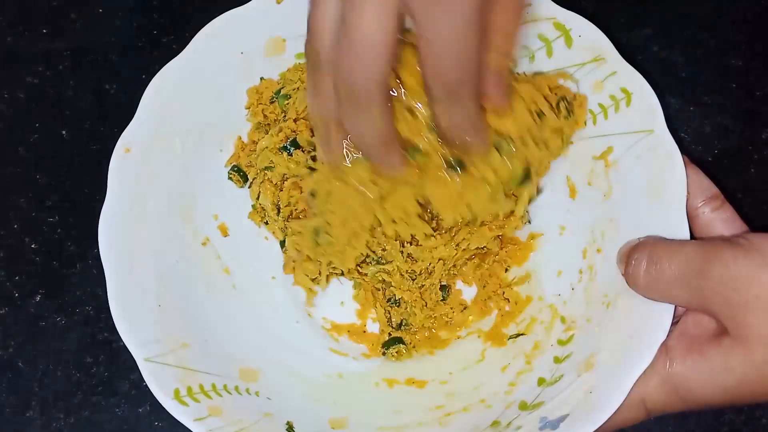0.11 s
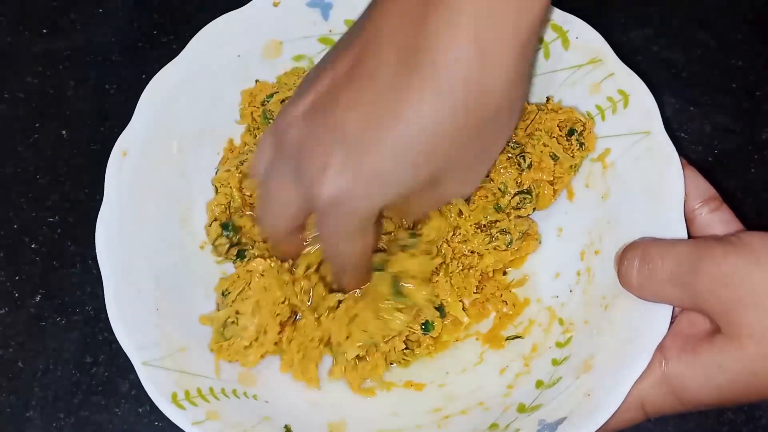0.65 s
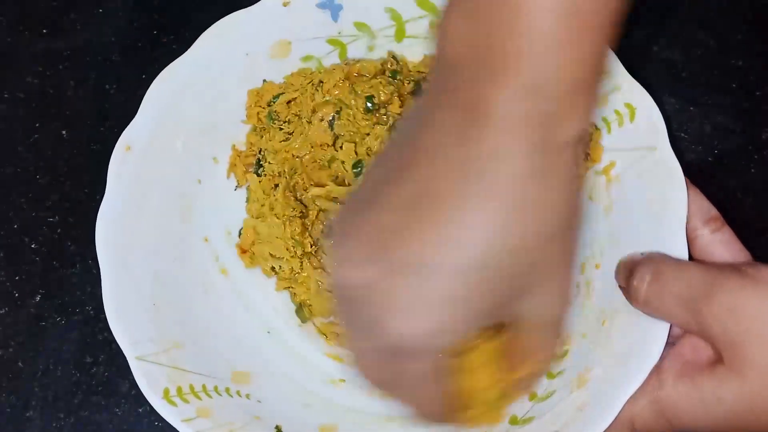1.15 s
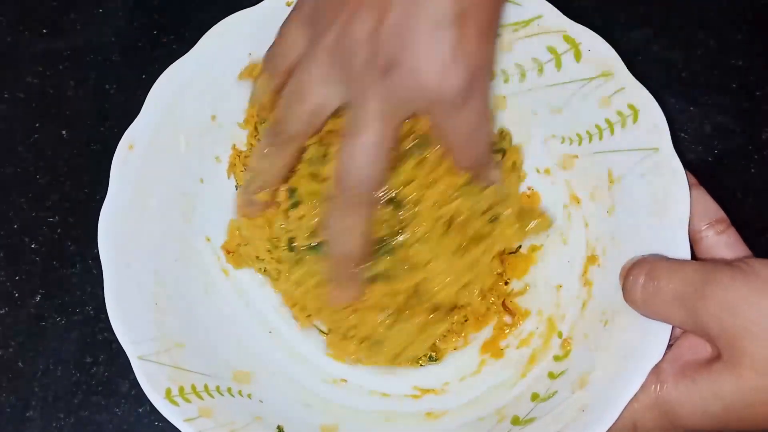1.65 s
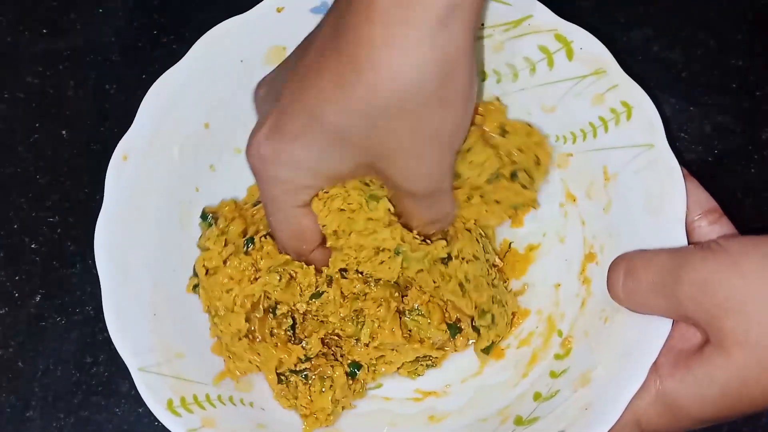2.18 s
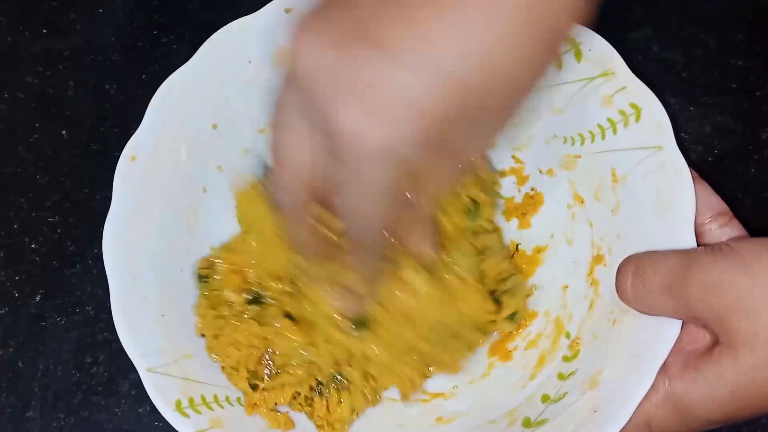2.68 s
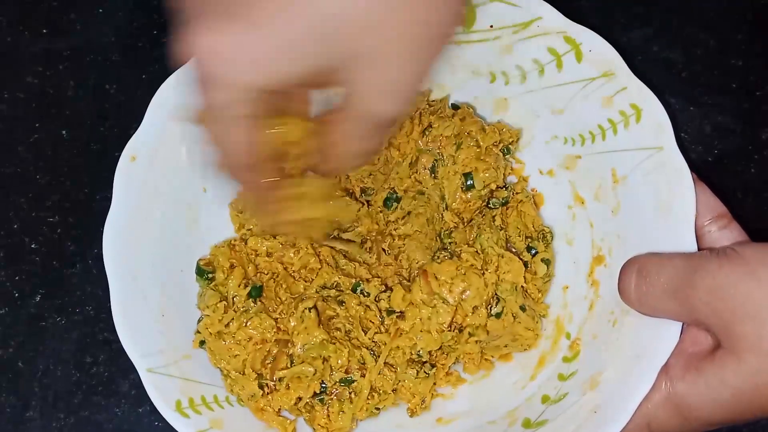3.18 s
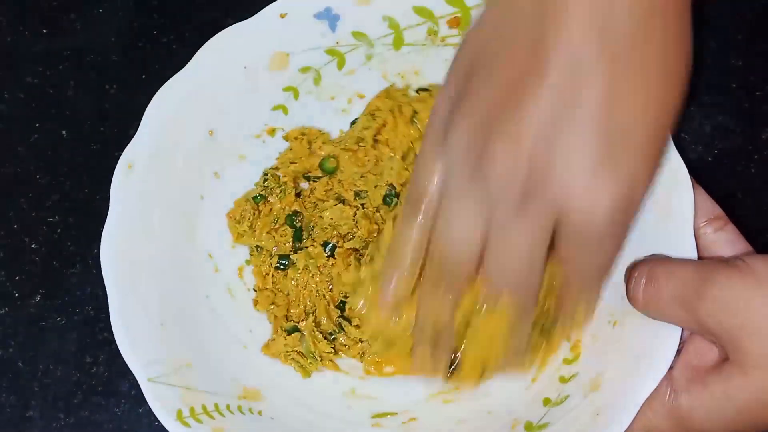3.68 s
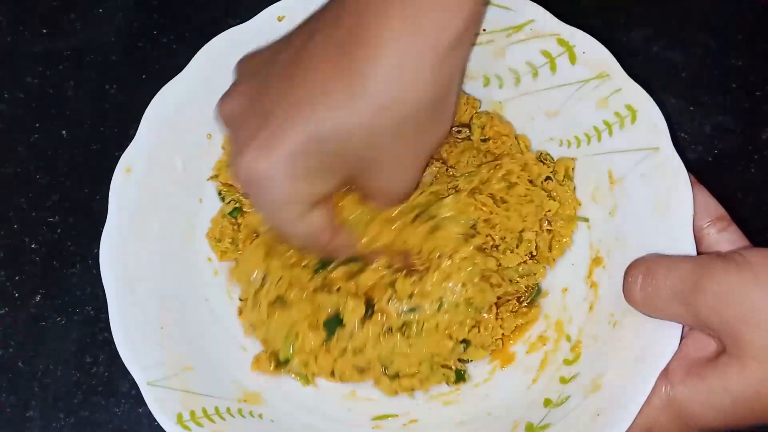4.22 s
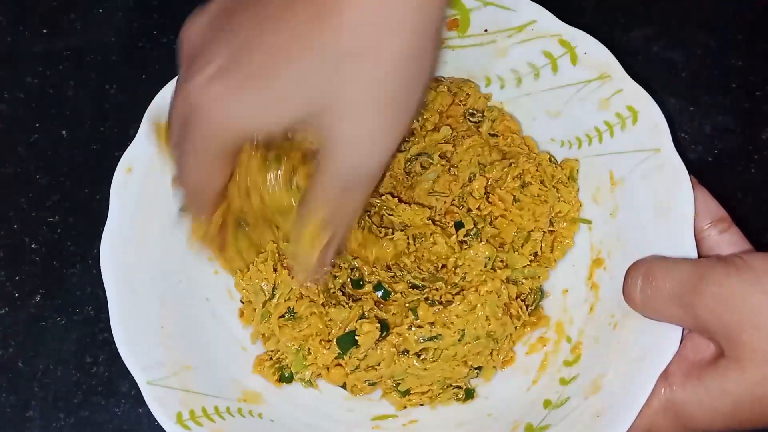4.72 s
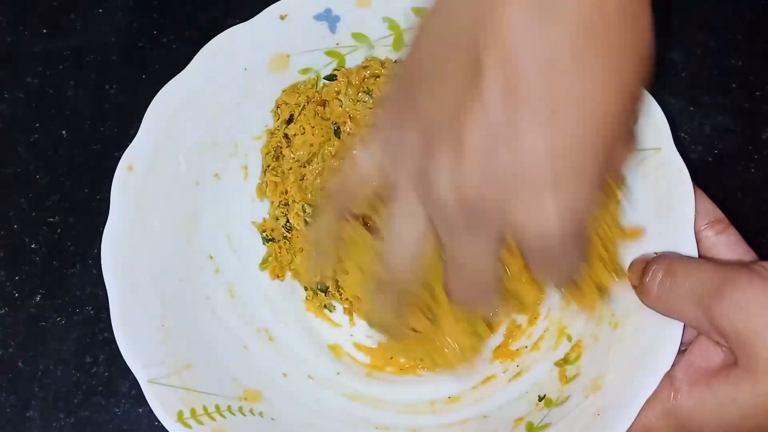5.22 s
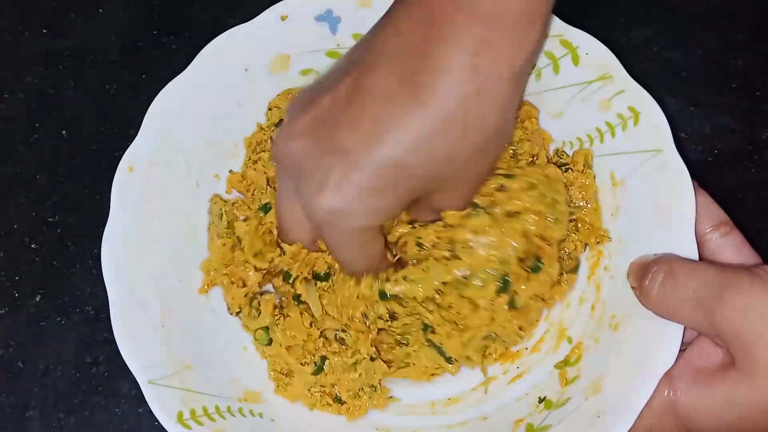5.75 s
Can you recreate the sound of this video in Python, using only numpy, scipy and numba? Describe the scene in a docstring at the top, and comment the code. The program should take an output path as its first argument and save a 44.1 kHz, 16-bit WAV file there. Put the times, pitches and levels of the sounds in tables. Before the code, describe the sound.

Very close in a small hard-walled kitchen, a hand kneads a wet, sticky vegetable mix. It opens with a hollow bowl knock, then gentle crackling and isolated smacks; a strong knock and pop lands near 0.8 s. The loudest wet squelch bursts around 2.1 s, quieter stirring follows, and from 4 s the squeezes grow denser. Soft low bumps and faint hum sit beneath.

```python
"""Kneading a wet dough by hand

A hand kneads a sticky vegetable and flour mix in a bowl on a kitchen counter, a phone close by.
Bursting air pockets are short sine grains: dense crackle, lone smacks of tearing film and deep pops.
The bowl rocks, rubs and is knocked: noise through its resonances; narrow notes swell and fade.
Pockets also sound in a decaying noise tail, the hard-walled kitchen; a faint coloured hum lies below."""
import sys
import numpy as np
from scipy import signal
from scipy.fft import rfft, irfft
from scipy.io import wavfile
from scipy.ndimage import uniform_filter1d
from numba import njit

SR = 44100
rng = np.random.default_rng(int(sys.argv[2]) if len(sys.argv) > 2 else 0)


def store_pcm(level_fs):
    """Save levels as 16-bit WAV."""
    pcm = np.round(np.clip(level_fs, -1, 1) * 32767).astype(np.int16)
    wavfile.write(sys.argv[1], SR, np.atleast_2d(pcm).T)


def amplitude_ratio(level_db):
    """Convert a level in decibels to the matching linear amplitude (field) ratio."""
    exponent = np.asarray(level_db, float) / 20
    return 10 ** exponent


N = 258867
TIME = np.arange(N) / SR


def level(x, db):
    """Scale to an rms level."""
    return x * amplitude_ratio(db) / np.sqrt(np.mean(x ** 2))


def colour(x, points):
    """Weight the spectrum by (frequency [Hz], level [dB]) points, joined over log frequency."""
    hz, db = np.transpose(points)
    bins = np.maximum(np.fft.rfftfreq(N, 1 / SR), 1)
    weight = amplitude_ratio(np.interp(np.log(bins), np.log(hz), db))
    return irfft(rfft(x) * weight, N)


def ring(x, modes):
    """Sum of resonances (frequency [Hz], width [Hz], level [dB]) driven by x."""
    out = 0
    for hz, width, db in modes:
        out = out + amplitude_ratio(db) * signal.lfilter(*signal.iirpeak(hz, hz / width, fs=SR), x)
    return out


def band_pass(x, low_hz, high_hz):
    """Keep what lies between two frequencies."""
    return signal.sosfilt(signal.butter(2, [low_hz, high_hz], "band", fs=SR, output="sos"), x)


def walk(rate):
    """Random levels held 1 / rate s and slewed; spread near 1."""
    held = int(SR / rate)
    steps = np.repeat(rng.standard_normal(N // held + 1), held)
    return uniform_filter1d(steps, held)[:N]


def gestures(s, held, db, rise, fall, rest_db):
    """Gain over time: each gesture rises, holds and falls at fixed dB/s; powers add to a resting level."""
    power = amplitude_ratio(2 * rest_db) + 0 * TIME
    for start, hold, top_db in zip(s, held, db):
        near = slice(max(int((start - .3) * SR), 0), int((start + hold + .5) * SR))
        t = TIME[near] - start
        drop_db = rise * np.maximum(-t, 0) + fall * np.maximum(t - hold, 0)
        power[near] += amplitude_ratio(2 * (top_db - drop_db))
    return np.sqrt(power)


@njit
def bubbles(start_s, hz, cycles, size, glide):
    """Each burst pocket swells for the given cycles, then dies away while its pitch rises."""
    out = np.zeros(N)
    for g in range(len(hz)):
        tau, first = cycles[g] / hz[g] * SR, start_s[g] * SR
        for i in range(int(first) + 1, min(int(first + 8 * tau), N)):
            u = (i - first) / tau
            swell = u * np.exp(1 - u)
            out[i] += size[g] * swell * np.sin(2 * np.pi * cycles[g] * u * (1 + glide * u))
    return out


# gentle stirring between squeezes: (time [s], level of middle pockets [dB])
STIRRING = [(0, -78), (.2, -82), (.32, -73), (.68, -74), (.95, -86.5), (1.2, -75.5), (1.6, -73), (1.7, -77),
            (1.8, -66), (2.24, -67.5), (2.8, -78), (3.07, -70.5), (3.27, -88), (3.5, -78), (4.0, -69),
            (4.15, -59), (4.4, -73), (4.68, -85), (4.84, -78), (5.12, -68), (5.52, -69), (5.87, -70)]
# squeezes of the hand: (time [s], held [s], level of middle pockets [dB],
#   large pockets [dB re middle], tiny pockets [dB re middle])
HAND_SQUEEZES = [(.01, 0.013, -61.5, 0, -1), (.327, 0.021, -64, -6, -3), (0.418, 0.16, -65.5, -29, 1),
                 (.585, 0.0064, -51.5, -11, -5.5), (0.713, 0.0075, -64.5, -2, -2),
                 (0.777, 0.011, -47, -17, -7.5), (.992, 0.046, -73.5, -2, -16),
                 (1.062, .13, -66, -6.5, -1.5), (1.626, 0.0063, -54.5, -25, -4.5),
                 (1.79, .2, -69.5, -32, -15), (1.999, 0.025, -54.5, -22, -4.5), (2.04, .02, -49, -15, -19),
                 (2.069, 0.015, -45, -2.5, -3.5), (2.132, 0.0039, -45.5, 6, -8),
                 (2.157, 0.0066, -50.5, 1.5, -26), (2.836, .18, -61, -7.5, 0), (3.11, 0.03, -54.5, -2.5, 1),
                 (3.46, 0.0075, -71.5, -28, 8.5), (3.545, .09, -65, -11, -5), (3.755, 0.011, -69.5, -7, 8),
                 (3.84, 0.051, -62, -18, -2), (3.933, 0.0046, -60.5, -32, -4),
                 (4.167, 0.028, -50, -10.5, -12), (4.24, 0.085, -56.5, -8.5, -3.5),
                 (4.446, 0.079, -60.5, -17, -3), (4.531, 0.016, -54.5, -8, -2.5),
                 (4.859, .06, -57.5, -11, -6.5), (4.94, 0.098, -61, -5.5, -4),
                 (5.15, 0.094, -60.5, -10, -3.5), (5.373, 0.0052, -53.5, -29, -3),
                 (5.6, 0.064, -66, 7, -0.5), (5.689, 0.074, -60, 2.5, -1), (5.769, 0.027, -56.5, -1.5, -1)]


def effort():
    """Gains of large, middle and tiny pockets: brief squeezes add power to the stirring."""
    rise_db_s, fall_db_s = 1194.5, 330.5
    stir_large_db, stir_tiny_db = -13, 2  # re middle pockets
    s, held, db, large_db, tiny_db = np.transpose(HAND_SQUEEZES)
    stir_db = np.interp(TIME, *np.transpose(STIRRING))
    large = gestures(s, held, db + large_db, rise_db_s, fall_db_s, stir_db + stir_large_db)
    middle = gestures(s, held, db, rise_db_s, fall_db_s, stir_db)
    tiny = gestures(s, held, db + tiny_db, rise_db_s, fall_db_s, stir_db + stir_tiny_db)
    return large, middle, tiny


# air pockets, large, middle, tiny:
#   (lowest [Hz], highest [Hz], rate [bursts/s], cycles in two rise times, size scatter [dB])
POCKET_SIZES = [(1308, 4280, 1200, 1.48, 4), (3160, 9300, 3200, 1.07, 3.0), (8500, 15400, 3500, 4.4, 4)]
# trapped pockets that keep ringing, one row of the same columns
RINGING_POCKETS = (1700, 7000, 220, 44.0, 2.5)
# colour of the close phone on the crackle: (frequency [Hz], level [dB])
PHONE_COLOUR = [(800, -23.5), (1500, 0.5), (3000, 1), (4900, 8), (5900, 11.5), (7200, 6.5), (8100, -6),
                (9200, 1.5), (10800, -3), (13000, -13), (14200, -8), (15300, 5.5), (16500, -18)]


def crackle(large, middle, tiny):
    """Pockets of each size burst at random, in flurries; those close in time have like pitch."""
    ringing = middle * amplitude_ratio(-5.0)
    flurry = amplitude_ratio(0.81 * walk(41))
    out = 0
    kinds = zip(POCKET_SIZES + [RINGING_POCKETS], (large, middle, tiny, ringing))
    for (low_hz, high_hz, rate, cycles, scatter_db), gain in kinds:
        when, own, rarity = rng.random((3, int(rate * N / SR)))
        drift = np.tanh(walk(25))[(when * (N - 1)).astype(int)]
        # share of pitch in common with neighbours; the tiniest pockets have none
        alike = 0.39 * (high_hz < 10000)
        place = np.clip(own * (1 - alike) + alike * (1 + drift) / 2, 0, 1)
        hz = low_hz * (high_hz / low_hz) ** place
        size = amplitude_ratio(-scatter_db * np.log(rarity + 4e-3))
        grains = bubbles(when * N / SR, hz, cycles / 2 + 0 * hz, size, 0.024 / cycles)
        out = out + level(colour(grains, PHONE_COLOUR), 0) * gain
    return out * flurry


# decay of the kitchen: (frequency [Hz], time to fall by 60 dB [s])
KITCHEN_DECAY = [(250, 0.2), (1000, 0.45), (2000, 0.47), (4000, 0.15), (12000, 0.18)]


def kitchen(x):
    """Diffuse tail of unit energy, shorter in the treble, stronger at first from bowl and counter close by."""
    hz, t60 = np.transpose(KITCHEN_DECAY)
    t, tail = TIME[:SR], 0
    for centre in 125 * 2. ** np.arange(7):
        band = band_pass(rng.standard_normal(SR), centre / 2 ** .5, centre * 2 ** .5)
        band_t60 = np.interp(np.log(centre), np.log(hz), t60)
        tail = tail + band * np.exp(-np.log(1000) * t / band_t60)
    fade_in = np.clip(t / .005, 0, 1)
    tail = tail * fade_in * (1 + .3 * np.exp(-t / .008))
    return signal.fftconvolve(x, tail / np.sqrt(np.sum(tail ** 2)))[:N]


# colour of the room hum: (frequency [Hz], relative level per Hz [dB])
HUM_COLOUR = [(15, -38), (25, -34.5), (124, 12), (312, -1.5), (1430, -16.5), (1640, -1), (2460, -39.5),
              (6020, -29), (8120, -21), (9820, -9), (13600, -31.5), (15200, -12.5), (16400, -32.5)]


def room_hum():
    """Coloured noise at a faint level that wanders slowly."""
    return level(colour(rng.standard_normal(N), HUM_COLOUR), -79) * amplitude_ratio(2.0 * walk(1.0))


# low modes of bowl and counter: (frequency [Hz], width [Hz], level [dB])
ROCKING_MODES = [(106.8, 23.7, 16.5), (125.6, 6.2, 15.5), (175, 17, -15.5), (71, 36, -6.5)]
# the bowl rocks on the counter: (time [s], held [s], level before the low-pass [dB])
BOWL_ROCKS = [(.13, 0.019, -68), (.4, 0.025, -72), (.85, 0.1, -56.5), (1.0, 0.013, -60),
              (1.09, 0.014, -61.5), (1.27, 0.019, -68.5), (1.4, 0.012, -63.5), (1.67, .015, -73),
              (1.96, 0.3, -77.5), (2.5, 0.019, -66), (2.97, .015, -67.5), (3.12, 0.094, -62),
              (3.62, .08, -66.5), (3.76, 0.14, -64.5), (4.02, 0.022, -62), (4.21, 0.035, -61),
              (4.48, 0.0087, -67.5), (4.8, 0.033, -57.5), (5.0, 0.071, -70), (5.18, 0.061, -62),
              (5.37, .015, -63), (5.48, 0.14, -73)]


def rocking():
    """Noise of unsteady contact drives the low modes as the bowl rocks."""
    gain = gestures(*np.transpose(BOWL_ROCKS), rise=193.5, fall=130, rest_db=-77)
    thud = level(ring(rng.standard_normal(N), ROCKING_MODES), 0) * gain
    return signal.sosfilt(signal.butter(2, 330, fs=SR, output="sos"), thud)


# modes that rubbing drives: (frequency [Hz], width [Hz], level [dB])
RUBBING_MODES = [(239, 77, 2.5), (404, 41, 3), (480, 40, 3), (545, 31, -1.5), (610, 35, -7), (771, 68, -8),
                 (885, 450, -13.5), (1100, 990, -7)]
# the bowl rubs over the counter: (time [s], held [s], level before the band-pass [dB])
BOWL_RUBS = [(0.939, 0.067, -57), (1.85, 0.06, -70.5), (2.46, 0.13, -65.5), (3.96, 0.03, -68),
             (4.2, 0.017, -69), (4.43, .015, -67), (4.54, .015, -66.5), (4.8, 0.066, -62),
             (5.13, 0.013, -58.5), (5.3, 0.013, -65.5), (5.65, 0.033, -66.5)]


def rubbing():
    """Noise of an uneven grip drives the modes as the bowl rubs over the counter."""
    grip = amplitude_ratio(2.5 * walk(30))
    gain = gestures(*np.transpose(BOWL_RUBS), rise=220.5, fall=165, rest_db=-73)
    rub = level(ring(rng.standard_normal(N) * grip, RUBBING_MODES), 0) * gain
    return band_pass(rub, 210, 1500)


def swelling_notes(rows):
    """Noise in a steep resonance (the same one twice), under a swell and a random flutter."""
    out = np.zeros(N)
    for start, length, peak, hz, width, db in rows:
        first, size = int(start * SR), int(length * SR)
        mode = [(hz, width, 0)]
        noise = ring(ring(rng.standard_normal(SR), mode), mode)[-size:]
        swell = np.interp(np.arange(size) / size, [0, np.clip(peak, .02, .98), 1], [0, 1, 0])
        flutter = amplitude_ratio(2.7 * walk(60)[:size])
        out[first:first + size] += (level(noise, db) * swell * flutter)[:N - first]
    return out


# knocks that ring the bowl:
#   (time [s], ring [s], level before swell and flutter [dB], middle of the blow's spectrum [Hz])
BOWL_KNOCKS = [(0, .15, -46, 870), (.825, .19, -46, 480), (5.268, .14, -51, 865)]
# modes that a knock rings: (frequency [Hz], width [Hz], level [dB])
KNOCKED_MODES = [(242, 40, 3), (431, 61, -8.5), (480, 50, -3), (606, 30, -11.5), (802, 84, -3),
                 (1091, 66, 2)]


def knocks():
    """A blow rings each bowl mode, the more weakly the further it lies from the blow's own spectrum."""
    blow_octaves = 0.85  # a mode this far off is 6 dB weaker
    rows = []
    for s, length, db, blow_hz in BOWL_KNOCKS:
        for hz, width, mode_db in KNOCKED_MODES:
            off_db = 6 * (np.log2(hz / blow_hz) / blow_octaves) ** 2
            rows.append((s, length, .07, hz, width, db + mode_db - off_db))
    return swelling_notes(rows)


# deep pockets: (time [s], level [dB], pitch [Hz], room share [dB])
DEEP_POPS = [(.005, -28, 1008, -10.5), (0.602, -43, 2100, -4), (.82, -15.5, 1075, -1.5),
             (1.353, -55, 840, -4.5), (1.426, -49, 1120, -6), (1.927, -50.5, 1590, -4),
             (2.072, -41.5, 2180, -4), (2.085, -41.5, 1600, -12), (2.131, -40.5, 1500, -7),
             (2.154, -36, 2410, -4.5), (2.164, -43, 1960, -8), (2.481, -58.5, 1060, 5),
             (2.983, -52, 1440, -16.5), (3.112, -59, 2230, 8), (3.221, -60.5, 1230, 2.5),
             (3.41, -38.5, 1160, -8.5), (3.96, -49.5, 1650, -1), (4.244, -43, 2570, -12),
             (4.538, -46.5, 1210, -7.5), (4.998, -44.5, 310, -3), (5.115, -49.5, 1600, -5),
             (5.191, -38, 1125, -0.5), (5.255, -46, 1200, -11), (5.274, -36.5, 1100, -14),
             (5.296, -47, 1150, -38), (5.749, -49, 2130, 6)]


def pops():
    """Returns direct pops, each with a higher overtone, and the blunter blow that reaches the kitchen."""
    s, db, hz, room_db = np.transpose(DEEP_POPS)
    s, hz = np.tile(s, 2), np.r_[hz, 1.5 * hz]
    db = np.r_[db, db - 7.5]
    cycles = 1 + 0 * hz
    direct = bubbles(s, hz, cycles, amplitude_ratio(db), 0.017)
    sent = bubbles(s, hz, 0.61 * cycles, amplitude_ratio(db + np.tile(room_db, 2)), 0.068)
    return direct, sent


def small_smacks(middle, count=130):
    """Rows like the loud smacks, at random moments, stronger where the kneading is."""
    when, pitch, spread, size = rng.random((count, 4)).T
    kneading_db = 20 * np.log10(middle[(when * (N - 1)).astype(int)])
    # around -51 dB when the middle pockets are at -65 dB, scattered by up to 8 dB
    db = 0.71 * (kneading_db + 65) - 51 + 8 * (2 * size - 1)
    return np.c_[when * N / SR, db, 4000 * 2 ** (1.1 * pitch), .2 + .4 * spread]


# loud smacks of sticky film letting go:
#   (time [s], level of the first pocket [dB], pitch [Hz], spread [octaves])
LOUD_SMACKS = [(.038, -39, 9360, 0.16), (.325, -48.5, 4000, 0.76), (.339, -41.5, 6550, 0.11),
               (.4965, -38.5, 8300, 0.23), (.58, -34, 5700, .32), (.5892, -35.5, 5550, 0.66),
               (.764, -39, 6770, 0.56), (.777, -35, 5860, 0.3), (.7838, -25.5, 5700, 0.45),
               (.82, -38.5, 2870, 0.18), (1.081, -41.5, 9700, 0.23), (1.1878, -41, 6060, 0.21),
               (1.453, -50.5, 6080, .19), (1.486, -44.5, 9600, .19), (1.5172, -50, 5130, 0.27),
               (1.6308, -25.5, 4670, 0.29), (2.0363, -38, 4700, 0.24), (2.0665, -30, 5630, 0.32),
               (2.0703, -31, 6700, 0.24), (2.0835, -24, 6750, 0.29), (2.1332, -25.5, 4980, 0.25),
               (2.157, -26.5, 5100, 0.23), (2.1652, -30.5, 5660, 0.14), (2.241, -44, 8300, 0.2),
               (2.748, -45.5, 9400, 0.3), (2.84, -43.5, 6070, 0.15), (2.9966, -37.5, 5200, 0.7),
               (3.1048, -43, 8750, .16), (3.115, -37, 8200, 0.17), (3.1451, -47, 3950, .37),
               (3.461, -43, 9900, 0.66), (3.5337, -41.5, 8300, 0.81), (3.633, -41.5, 4570, 0.3),
               (3.671, -43, 6500, 0.49), (3.7467, -44, 8840, .33), (3.8448, -34, 7900, 0.7),
               (3.8602, -30, 9000, 0.82), (3.8959, -45, 9800, 0.24), (3.9268, -40.5, 9900, 0.15),
               (3.9348, -39.5, 5050, 0.36), (4.1678, -34.5, 5430, 0.48), (4.197, -45, 5300, .35),
               (4.2475, -42, 4100, 0.77), (4.258, -40.5, 7100, 0.36), (4.3168, -43, 5060, 0.33),
               (4.4346, -32, 9840, 0.18), (4.4496, -41, 5630, 0.1), (4.4871, -41, 5360, 0.22),
               (4.5055, -43, 5400, .17), (4.5245, -33.5, 6270, 0.56), (4.5487, -41, 5700, 0.51),
               (4.86, -40, 5930, 0.33), (4.879, -40, 5700, 0.26), (4.9132, -35, 6000, 0.23),
               (4.9334, -34.5, 5660, 0.26), (5.15, -40, 9950, 0.36), (5.1665, -39.5, 6100, 0.083),
               (5.1917, -39.5, 5600, 0.68), (5.224, -41, 5150, 0.75), (5.271, -39, 8700, 0.26),
               (5.3004, -45, 3060, .29), (5.3149, -43, 3560, 0.37), (5.348, -42, 4830, 0.44),
               (5.367, -36.5, 10000, 0.13), (5.3786, -37, 5800, 0.34), (5.3832, -38, 9150, 0.8),
               (5.4406, -38, 7300, 0.7), (5.571, -44, 9100, 0.3), (5.6525, -46, 3220, 0.32),
               (5.7234, -33.5, 5900, 0.66), (5.7724, -32, 7540, 0.95)]


def smacks(middle, count=5):
    """A film tears as a handful of pockets about one pitch; returns the direct sound and the room send."""
    tear_s = 0.00133  # usual time from first to last pocket
    s, db, hz, octaves = np.r_[LOUD_SMACKS, small_smacks(middle)].T[:, :, None]
    chance = rng.standard_normal((len(s), count, 2))
    order = np.arange(count)
    # the first pocket sits near the pitch, later ones alternate above and below it
    offset = (order + 1) // 2 * (-1) ** order * 0.43 + 0.29 * chance[..., 0]
    pitch = np.clip(hz * 2 ** (octaves * offset), 1000, 16000)
    start = np.abs(s + tear_s * order / (count - 1) * (1 + 0.214 * chance[..., 1])).ravel()
    # a narrow spread of pitch means pockets that ring longer
    cycles = (0.35 / np.clip(octaves, .1, 1) + 0 * pitch).ravel()
    size = amplitude_ratio(db - 3.0 * order)
    # the room has a smaller share of loud, near smacks
    room_db = -9.5 - .5 * (db + 39)
    direct = bubbles(start, pitch.ravel(), cycles, size.ravel(), 0.011)
    sent = bubbles(start, pitch.ravel(), cycles, (size * amplitude_ratio(room_db)).ravel(), 0.011)
    return direct, sent


# narrow notes that swell and fade:
#   (time [s], length [s], peak [share of length], pitch [Hz], level before swell and flutter [dB])
NARROW_NOTES = [(.355, 0.045, 0.3, 3020, -60), (0.601, 0.059, 0.12, 1753, -57),
                (0.833, 0.13, 0.079, 3090, -56), (0.954, 0.24, 0.087, 1395, -56),
                (1.056, 0.038, 0.32, 3954, -61), (1.628, 0.081, .05, 3910, -54),
                (2.127, .14, 0.017, 1353, -49), (2.3, 0.093, 0.049, 2690, -63),
                (2.302, 0.033, .18, 3700, -64), (2.329, .15, 0.77, 1693, -69), (2.988, .2, 0.62, 1380, -65),
                (3.131, .12, .15, 3420, -66), (3.41, 0.061, .05, 1197, -57), (3.529, .062, .15, 5740, -63),
                (3.54, .16, .5, 4670, -63.5), (3.539, 0.22, 0.21, 3170, -63.5),
                (3.954, .52, 0.55, 1678, -65), (4.052, 0.26, .35, 2160, -61), (4.305, .18, 0.73, 480, -57),
                (4.691, 0.38, 0.14, 1547, -63.5), (4.721, .11, 0.3, 743, -68),
                (4.782, 0.21, 0.6, 885, -67.5), (4.865, .21, 0.32, 5000, -56.5),
                (4.88, .23, 0.35, 545, -57), (4.993, .07, 0.14, 367.5, -46.5),
                (5.064, 0.13, 0.38, 1654, -61.5), (5.1, 0.069, .24, 535, -57),
                (5.191, .05, 0.078, 1143, -51.5), (5.57, 0.31, 0.57, 1604, -65),
                (5.619, 0.16, 0.43, 2400, -69), (5.64, .17, 0.42, 3120, -62.5)]


def notes():
    """Narrow notes, each as wide as a fixed share of its pitch."""
    return swelling_notes([(s, length, peak, hz, 0.066 * hz, db)
                           for s, length, peak, hz, db in NARROW_NOTES])


def scene():
    """Near sounds, their echo in the kitchen and the hum."""
    large, middle, tiny = effort()
    crackling = crackle(large, middle, tiny)
    pop, pop_sent = pops()
    smack, smack_sent = smacks(middle)
    wet = kitchen(pop_sent + smack_sent + crackling * amplitude_ratio(-29.5))
    bowl = rocking() + rubbing() + knocks()
    return (crackling + wet + room_hum() + bowl + pop + smack + notes())[None]


def band_limit(x):
    """A steep low-pass at the top of the band."""
    return signal.sosfilt(signal.butter(12, 16600, fs=SR, output="sos"), x)


def record(dry):
    """The phone cuts the top and thins the deep bass."""
    topped = signal.sosfilt(signal.ellip(8, .5, 45, 15800, fs=SR, output="sos"), dry)
    thinned = signal.sosfilt(signal.butter(2, 50, "high", fs=SR, output="sos"), topped)
    return band_limit(thinned)


dry = scene()
out = record(dry)
store_pcm(out)
```